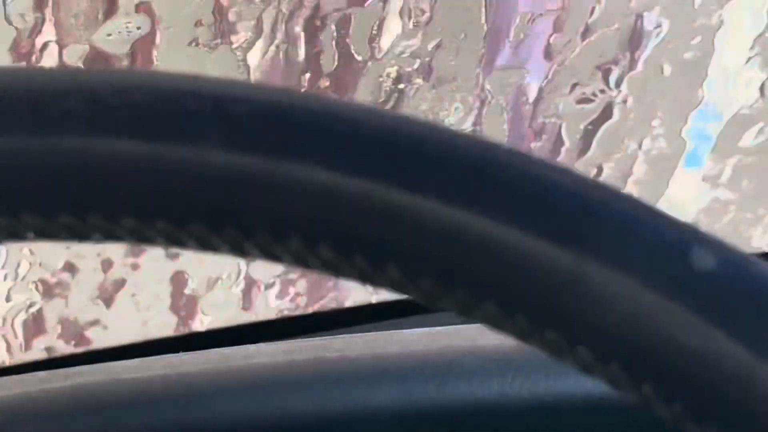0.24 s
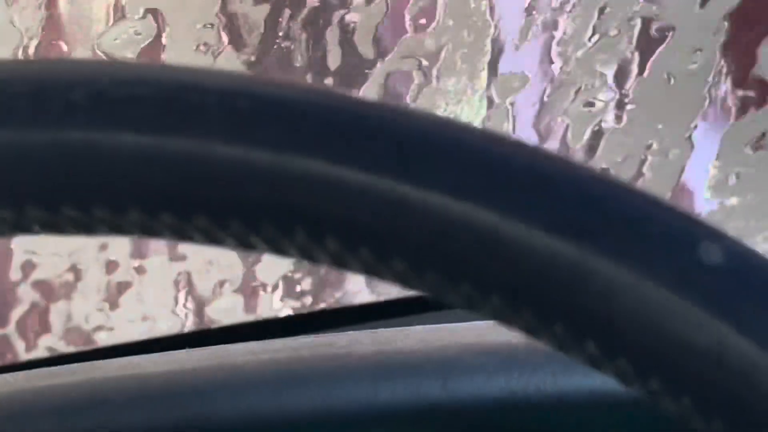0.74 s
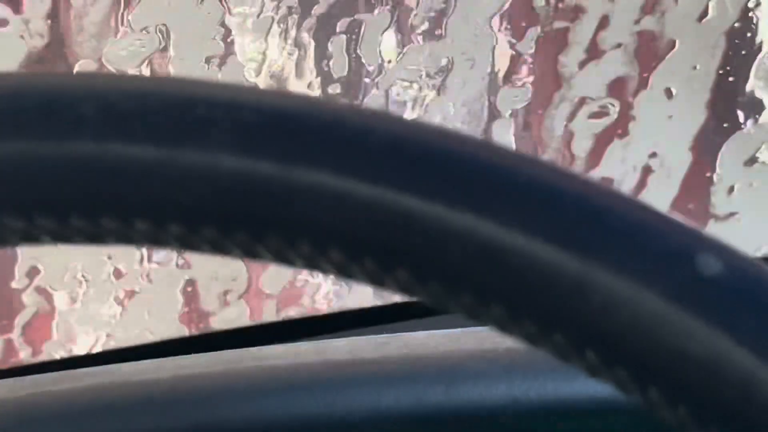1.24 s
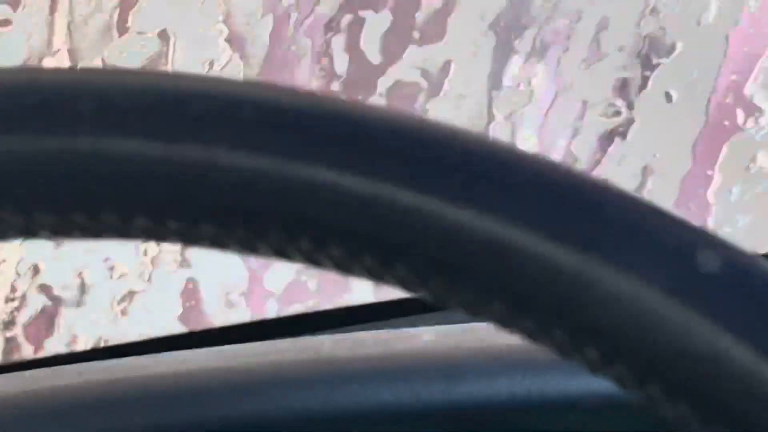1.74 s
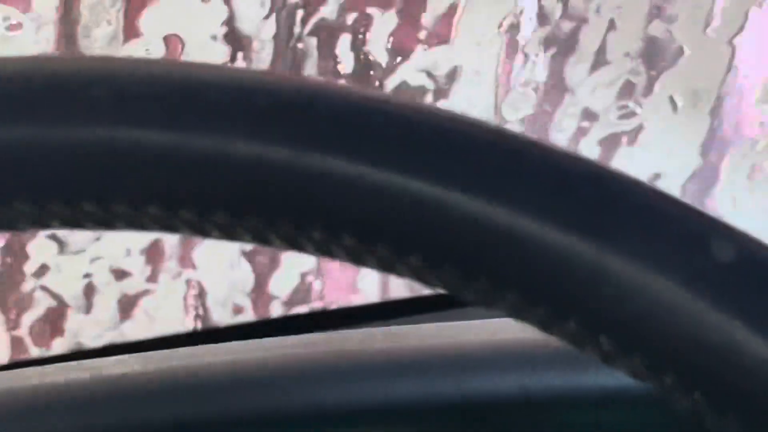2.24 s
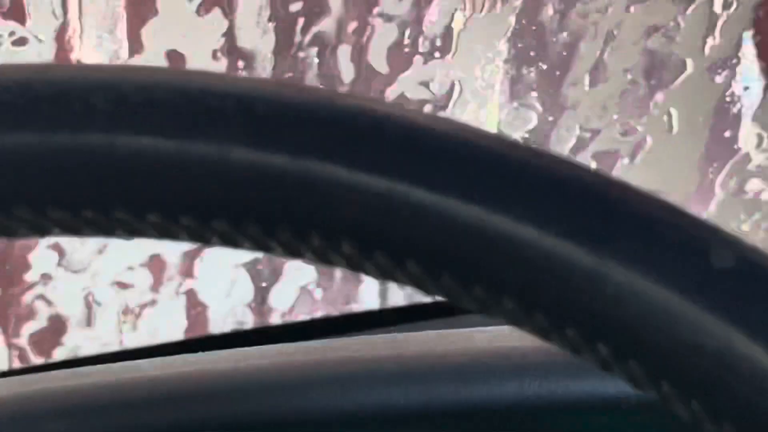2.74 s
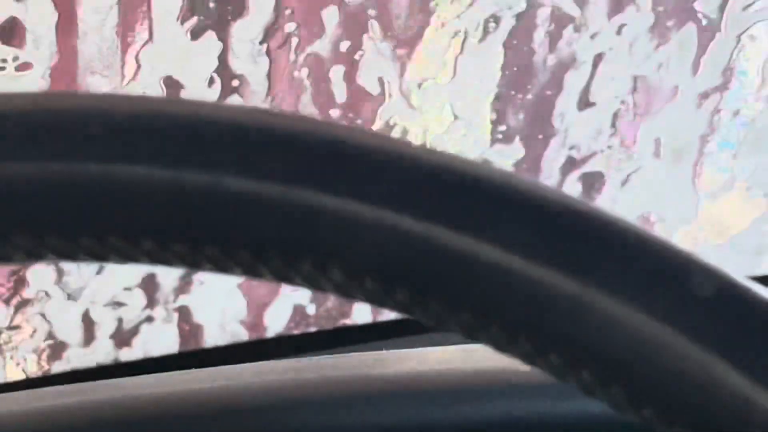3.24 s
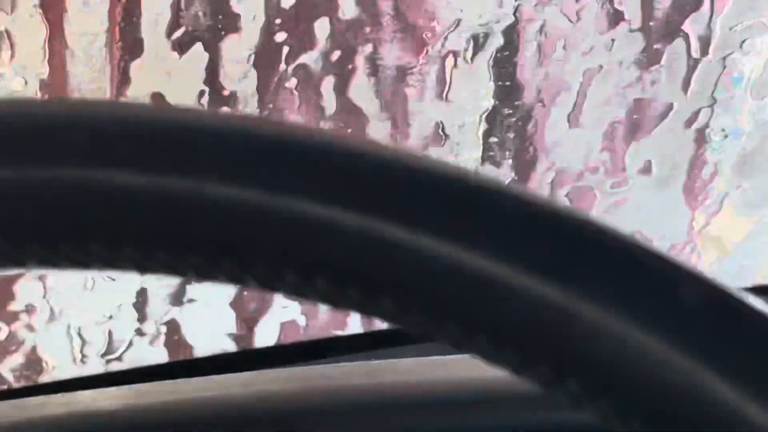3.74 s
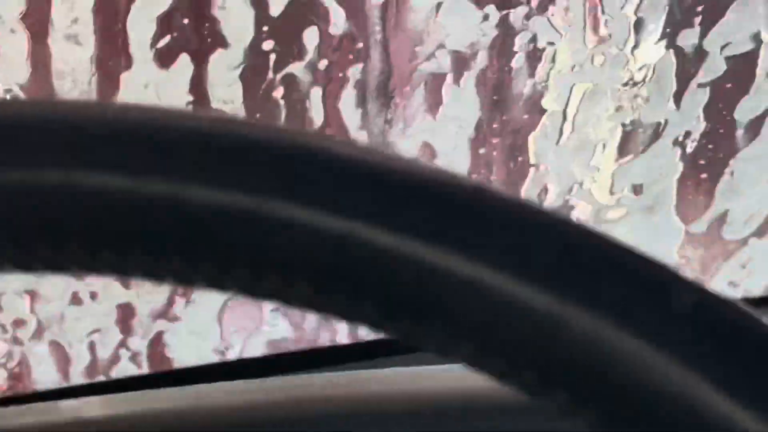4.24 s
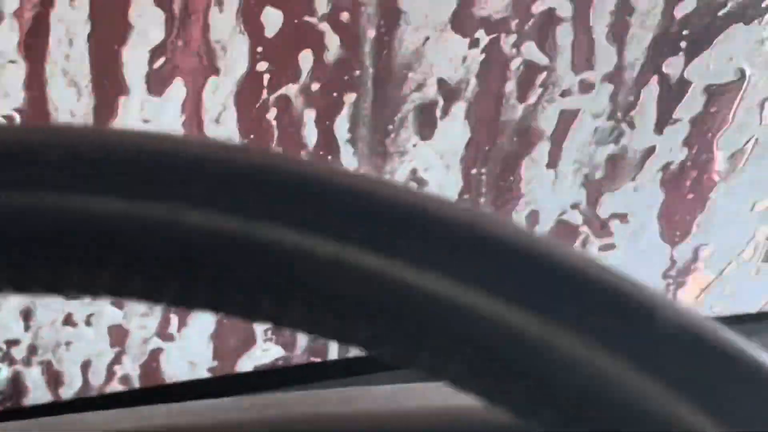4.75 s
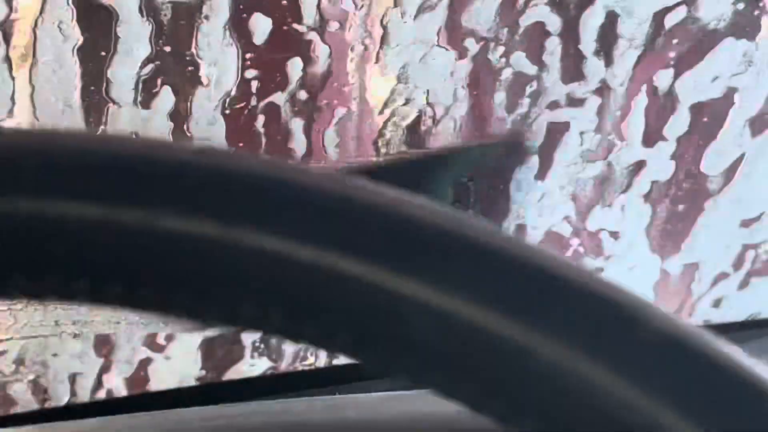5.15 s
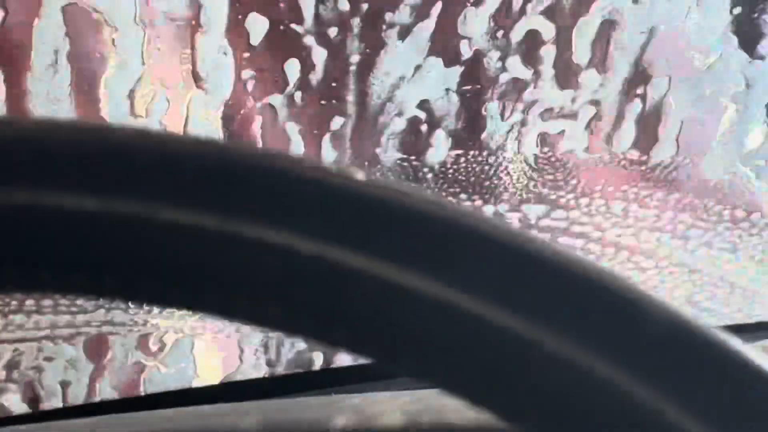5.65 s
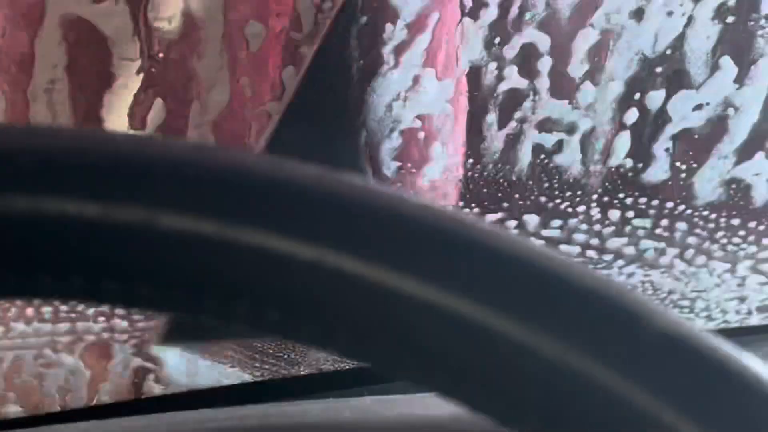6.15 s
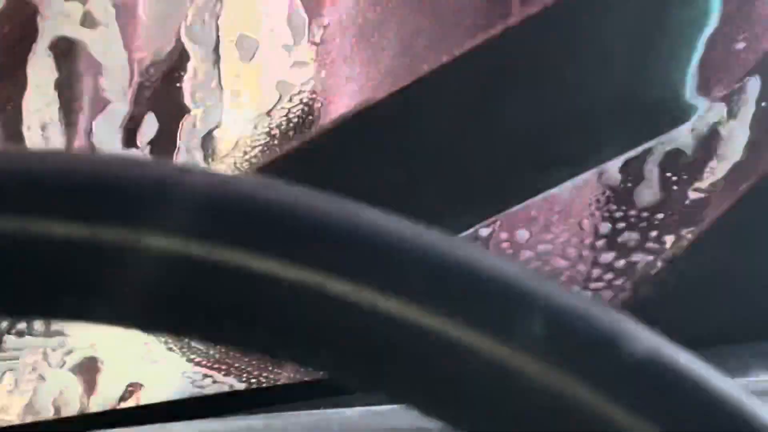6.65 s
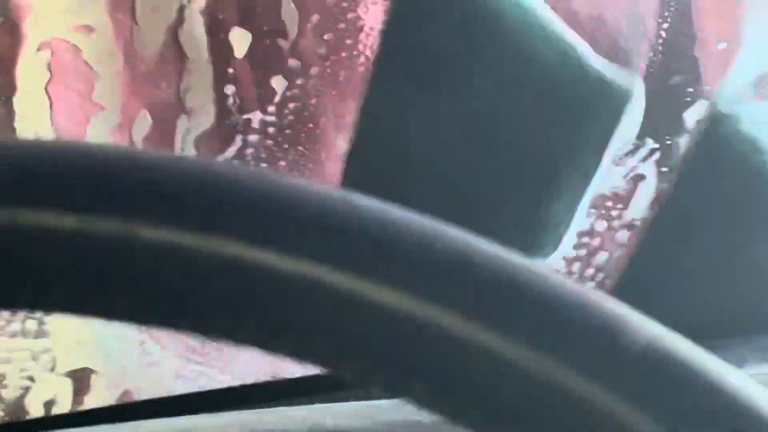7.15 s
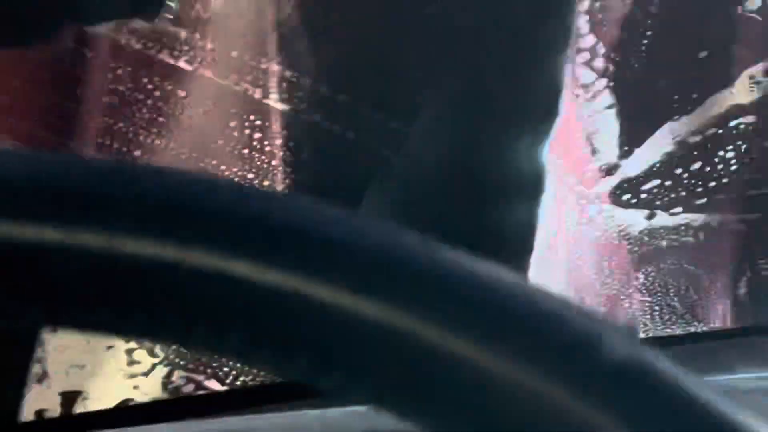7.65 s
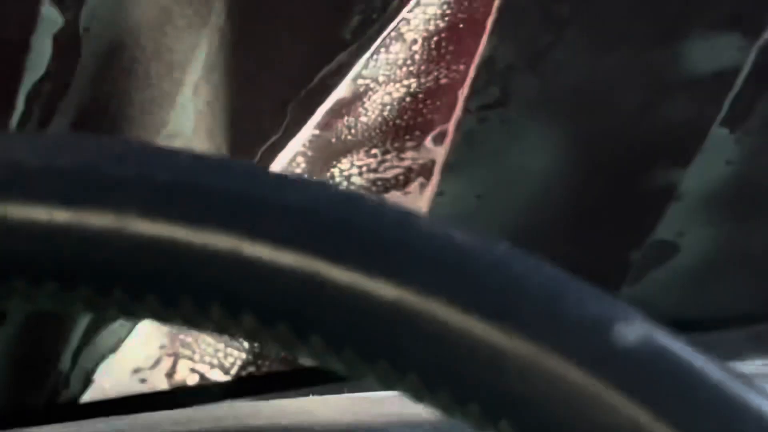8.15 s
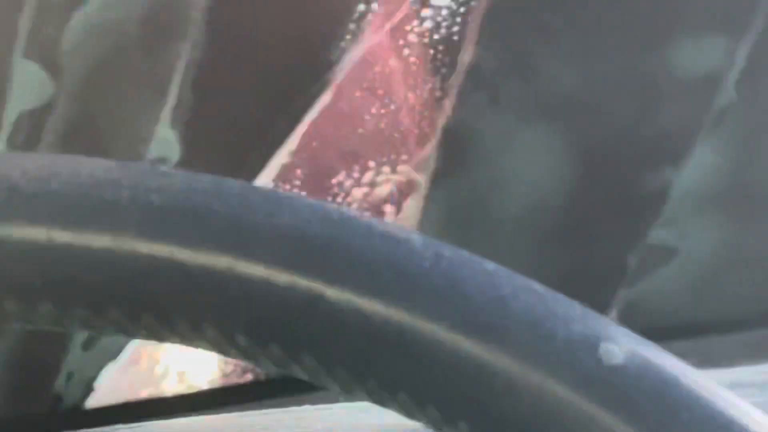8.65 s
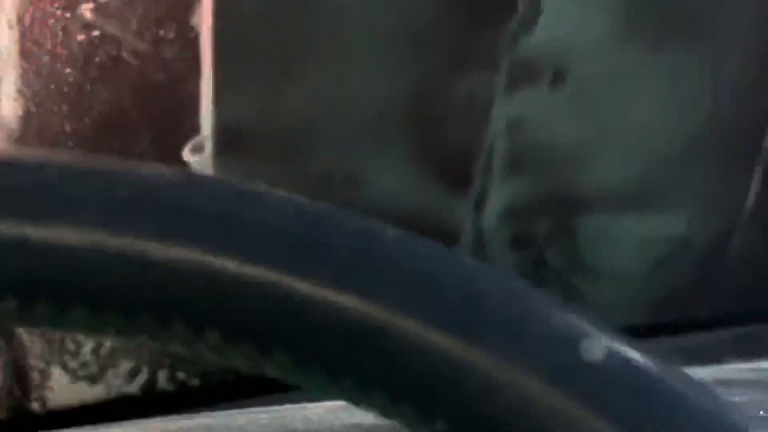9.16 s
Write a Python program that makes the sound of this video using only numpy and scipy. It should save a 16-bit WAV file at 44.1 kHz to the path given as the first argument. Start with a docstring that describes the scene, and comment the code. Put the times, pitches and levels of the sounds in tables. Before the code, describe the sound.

Inside a car in an automatic car wash: a deep steady rumble, droning motors and a wavering pump whine, with water washing and drops ticking.

```python
"""Inside a closed car in an automatic car wash. Water and cloth strips shake the panels into a rumble,
water washes over the roof, and spray and mist hiss on the glass, all coloured by the cabin's resonances.
Motors drone through the body, and a pump hums and throbs while its vanes add a whine that comes and goes.
Heavy drops smack the windscreen among lighter ticks. One wet strip thuds on the roof, and near the end
another drags across the glass."""
import sys
import numpy as np
from scipy import signal
from scipy.fft import rfft, irfft, next_fast_len
from scipy.io import wavfile
from scipy.ndimage import uniform_filter1d, minimum_filter1d, map_coordinates

SR = 44100
rng = np.random.default_rng(int(sys.argv[2]) if len(sys.argv) > 2 else 0)


def wav_out(sig):
    """Save sig, one row per channel (or a flat mono array), as 16-bit PCM at SR to the path in sys.argv[1]."""
    wavfile.write(sys.argv[1], SR, np.round(np.clip(np.atleast_2d(sig).T, -1, 1) * 32767).astype(np.int16))


N = 414981
TIME = np.arange(N) / SR


# Panel vibration spectrum. Each row: frequency in Hz, relative spectral density in dB.
RUMBLE_SPECTRUM = [(18, -34.5), (30, -20.5), (43, -7.5), (70, -2), (105, -2), (135, -5.5), (190, -9.5),
                   (270, -13), (355, -15.5), (395, -20.5), (600, -28.5), (1200, -68.5), (4000, -110)]

def panel_rumble(level_db=-16.5, surge_db=0.5):
    """Forced vibration: water and cloth drive the panels at random, and these radiate mostly bass."""
    return amp(level_db + surge_db * wobble(3)) * cabin(churn(patchy_db=0.1), RUMBLE_SPECTRUM)


# Spectrum of running water. Each row: frequency in Hz, relative spectral density in dB.
WASH_SPECTRUM = [(200, -28.5), (400, -3.5), (520, 0), (720, -8), (900, -9), (1050, -11.5), (1450, -13),
                 (1950, -20), (2250, -22), (2800, -26), (4000, -43.5), (8000, -60.5)]

def roof_wash(start_db=-30.5, rise_db_per_s=0.1644, surge_db=0.34):
    """Flow noise: water runs over the roof, growing as the car rolls in under the cloth strips."""
    level_db = start_db + rise_db_per_s * TIME + surge_db * wobble(4)
    return amp(level_db) * cabin(churn(patchy_db=0.7), WASH_SPECTRUM)


# The big motor swelling with its load. Each row: time in seconds, relative level in dB.
DRONE_LEVELS = [(0.0, -19.5), (0.65, -17), (2.6, -19.5), (3.9, -22), (4.25, -22), (4.5, -18), (6.75, -19.5),
                (7.45, -14.5), (7.7, -23.5), (7.9, -15), (8.35, -21.5), (9.4, -15)]
# Other machines in the tunnel. Each row: frequency in Hz, level in dB.
MACHINE_TONES = [(44.3, -26), (53.1, -30.5), (115, -36), (151, -40), (156.6, -31), (313.3, -41), (354, -43)]

def motors(drone_hz=70.8, gain_db=1, octave_db=-25, drift_hz=0.12, waver_db=2):
    """Structure-borne sound: brush and conveyor motors drone through the body, wavering with load."""
    level_db, = curves(DRONE_LEVELS)
    shaft = phase_of(drone_hz + drift_hz * wobble(1.91))
    big = amp(level_db + gain_db) * (tone(shaft) + amp(octave_db) * tone(2 * shaft))
    others = sum(amp(db + waver_db * wobble(2.5)) * tone(phase_of(hz + drift_hz * wobble(1.508)))
                 for hz, db in MACHINE_TONES)
    return (big + others) * lean_left(db=0.5)


# The pump's hum. Each row: multiple of the shaft frequency, level in dB.
HUM_ORDERS = [(3, -33), (4, -37), (5, -44), (6, -43.5), (7, -49), (11, -53.5)]
# Its throb. Each row: time in seconds, relative levels in dB of the first and second shaft orders.
THROB_LEVELS = [(0.0, -34, -38), (1.0, -24.5, -34), (2.9, -23.5, -29.5), (4.4, -33.5, -30.5),
                (6.05, -29.5, -23), (6.75, -31.5, -38), (9.4, -31, -30.5)]

def pump(shaft_hz=59.2, drift_hz=0.09, waver_db=2, throb_gain_db=1):
    """Rotational harmonics: the water pump sounds at whole multiples of its shaft frequency."""
    shaft = phase_of(shaft_hz + drift_hz * wobble(4))
    hum = sum(amp(db + waver_db * wobble(4)) * tone(order * shaft) for order, db in HUM_ORDERS)
    throb = sum(amp(db + throb_gain_db + waver_db * wobble(4.5)) * tone(order * shaft)
                for order, db in enumerate(curves(THROB_LEVELS), 1))
    return (hum + throb + vane_whine(shaft)) * lean_left(db=1.6)


# The whine coming and going. Each row: time in seconds, relative level in dB.
WHINE_LEVELS = [(0.0, -46), (0.15, -45), (0.25, -30), (0.38, -31.5), (0.48, -40), (0.68, -38), (0.85, -30),
                (0.97, -44), (1.2, -36), (1.31, -24.5), (1.39, -32), (1.48, -35), (1.67, -39), (1.8, -32),
                (1.92, -27.5), (2.02, -39.5), (2.15, -26), (2.32, -47), (2.65, -32.5), (2.85, -41),
                (3.1, -30), (3.3, -27), (3.62, -26), (3.86, -35.5), (4.07, -27), (4.25, -36), (4.4, -31.5),
                (4.6, -35.5), (4.75, -31), (4.85, -47), (5.2, -44), (5.35, -26.5), (5.55, -34.5),
                (5.73, -28.5), (5.88, -40), (6.15, -39.5), (6.3, -30), (6.55, -27.5), (6.88, -42.5),
                (7.12, -32.5), (7.25, -41), (7.4, -31), (7.68, -38), (7.92, -29), (8.05, -35), (8.25, -30),
                (8.35, -45), (8.48, -30.5), (8.85, -39), (8.98, -33.5), (9.35, -38)]
# Its sag under load. Each row: time in seconds, frequency shift in Hz.
WHINE_SAG = [(0.0, 0), (1.7, 1.5), (2.6, -1), (3.4, 0), (5.0, -1), (5.2, -6), (5.5, -1), (6.0, 0), (8.0, 1),
             (9.0, -1.5)]

def vane_whine(shaft, vanes=8, gain_db=0.43, octave_db=-24, flutter_db=3, stir_rad=0.45, lag_rad=0.58):
    """Blade-passing tone: each of the pump's vanes gives one pressure pulse per turn of the shaft."""
    level_db, = curves(WHINE_LEVELS)
    shift_hz, = curves(WHINE_SAG)
    passing = vanes * shaft + phase_of(shift_hz)
    # The whine reaches each ear by its own path, stirred by the moving water and cloth.
    ears = np.array([amp(flutter_db * wobble(28)) * tone(passing + lag + stir_rad * wobble(14))
                     for lag in (0, lag_rad)])
    octave = amp(octave_db + flutter_db * wobble(16)) * tone(2 * passing + stir_rad * wobble(30))
    return amp(level_db + gain_db) * (ears + octave)


# Heavy drops on the windscreen. Each row: start in seconds, relative smack level in dB, pitch in Hz,
# relative splash level in dB, time in seconds for the first crack to decay by 60 dB.
HEAVY_DROPS = [(3.058, -37.5, 3900, -68, 0.0045), (3.898, -54, 5000, -53.5, .008),
               (3.947, -52.5, 5470, -55, .025), (4.384, -51, 5000, -55.5, .014),
               (4.812, -48.5, 5500, -53.5, .035), (4.83, -51, 5030, -54.5, .03),
               (4.909, -48, 5000, -55, .03), (5.056, -47, 4200, -67, .02), (5.7, -44.5, 4600, -62, .016),
               (5.733, -39.5, 5400, -53, .034), (6.058, -45, 4600, -61, .032),
               (6.085, -41, 4200, -50, .018), (6.53, -44, 3000, -68.5, .02),
               (6.609, -42.5, 2600, -69, .018), (6.705, -38, 3200, -63.5, 0.016),
               (7.066, -37, 2200, -57.5, .03), (7.199, -40, 3000, -68.5, .014),
               (7.212, -35, 2600, -68, .016), (8.402, -44, 3400, -69, .008), (8.501, -40, 3200, -68, .008)]
# Spectra of smack and splash. Each row: frequency in Hz, relative spectral density in dB.
SMACK_SPECTRUM = [(1200, -9.5), (3000, 4.5), (4500, -2.5), (6500, -2.5), (9000, -23), (15000, -23)]
SPLASH_SPECTRUM = [(4000, -10.5), (8000, -3), (12000, 7.5), (15000, -4.5)]

def drops(smack_gain_db=2, splash_gain_db=-1, tail_db=-9, tail_stretch=5.8, width_octaves=0.76):
    """Impact noise: a drop cracks on the glass and splashes; a tight bead ticks, a loose blob spatters."""
    out = np.zeros((2, N + SR))
    t = np.arange(SR // 5) / SR
    hz = np.fft.rfftfreq(len(t), 1 / SR)
    smacks = cabin(rng.standard_normal((2, N)), SMACK_SPECTRUM)
    splashes = cabin(rng.standard_normal((2, N)), SPLASH_SPECTRUM)
    for start, smack_db, pitch_hz, splash_db, t60 in HEAVY_DROPS + light_drops():
        span = slice(round(start * SR), round(start * SR) + len(t))
        attack = 1 - np.exp(-t / (0.03 * t60))
        decay = amp(-60 * t / t60) + amp(tail_db - 60 * t / (tail_stretch * t60))
        band = np.exp(-0.5 * (np.log2((hz + 1) / pitch_hz) / width_octaves) ** 2)
        smack = amp(smack_db + smack_gain_db) * unit(irfft(rfft(smacks[:, span]) * band, len(t)))
        splash = amp(splash_db + splash_gain_db) * splashes[:, span]
        out[:, span] += attack * decay * (smack + splash)
    return out[:, :N]


def light_drops(count=45, smack_db=-46, spread_db=2, centre_hz=3600, splash_db=-65, t60=0.0057):
    """Random arrivals: small drops of uneven size and pitch, as rows like those of HEAVY_DROPS."""
    return [(when * (N / SR - 0.25), smack_db + spread_db * (2 * size - 1),
             centre_hz * 2 ** (pitch - 0.5), splash_db, t60)
            for when, size, pitch in rng.random((count, 3))]


# A strip landing on the roof. The entries: peak time in seconds, frequency in Hz, peak level in dB.
ROOF_THUD = (1.94, 35, -20)

def cloth_thud(half_length_s=0.053):
    """Panel-to-air coupling: a heavy wet strip pushes the roof and the cabin air booms briefly."""
    middle, hz, db = ROOF_THUD
    return amp(db) * bell(middle, half_length_s) * tone(2 * np.pi * hz * (TIME - middle))


# A strip crossing the glass. The entries: middle in seconds, half length in seconds, level in dB.
GLASS_DRAG = (9.28, 0.18, -33)
# Its swish. Each row: frequency in Hz, relative spectral density in dB.
SWISH_SPECTRUM = [(150, -18), (240, 8.5), (400, -8), (620, 2), (850, -10), (1250, -2), (1900, -14.5),
                  (4000, -28), (9000, -49.5)]

def cloth_drag():
    """Friction noise: a wet strip slides over the glass with an uneven swish."""
    middle, half_length, db = GLASS_DRAG
    envelope = amp(db + 2 * wobble(25)) * bell(middle, half_length)
    return envelope * cabin(churn(patchy_db=5), SWISH_SPECTRUM)


# Spectrum of spray on glass. Each row: frequency in Hz, relative spectral density in dB.
SPRAY_SPECTRUM = [(1200, -18), (2800, 5), (4000, -0.7), (5500, -6), (7000, -9.5), (9000, -40.5),
                  (14000, -33.5)]

def spray(level_db=-48, impact_share=0.43):
    """Shot noise: dense droplet impacts pepper the glass and merge with a hiss."""
    hiss = np.sqrt(1 - impact_share) * churn(patchy_db=0.8)
    impacts = np.sqrt(impact_share) * patter(per_second=1700, spread_db=0.5)
    return amp(level_db + 0.3 * wobble(11)) * cabin(hiss + impacts, SPRAY_SPECTRUM)


# Spectrum of the mist. Each row: frequency in Hz, relative spectral density in dB.
MIST_SPECTRUM = [(4000, -20), (7000, -0.5), (8300, 2), (9700, 2.5), (11000, 1.2), (12500, -1.8),
                 (14500, -9)]
# Wipes of the windscreen. Each row: middle in seconds, half length in seconds, lift in dB.
MIST_WIPES = [(2.032, 0.06, 3), (7.1, 0.11, 3), (7.543, 0.09, 2)]

def mist(level_db=-64):
    """Amplitude-modulated noise: the mist's fine hiss swells as wet strips wipe the windscreen."""
    wiping_db = sum(lift_db * bell(middle, half_length) for middle, half_length, lift_db in MIST_WIPES)
    return amp(level_db + wiping_db + 0.5 * wobble(18)) * cabin(churn(patchy_db=1.3), MIST_SPECTRUM)


# The cabin's resonances and dips. Each row: centre in Hz, width in Hz, gain in dB.
CABIN_RESONANCES = [(100, 16, 0.5), (347.4, 6.1, 4), (686, 30, 1.5), (877, 50, 2.5), (948, 15, 5.5),
                    (1630, 26, -4), (1697, 58, 2.5), (1928, 170, 4), (2570, 50, -0.5), (2570, 52, 1),
                    (3680, 160, -1.5), (3840, 130, 2), (7040, 77, 2.5)]
# Likeness of the two ears, then its top treble. Each row: frequency in Hz, correlation from -1 to 1.
COHERENCE = [(70, 1), (130, 0.97), (240, 0.72), (350, 0.88), (470, 0.7), (640, 0.3), (760, 0.48),
             (950, 0.27), (1150, 0.24), (1320, -0.25), (1600, -0.46), (1720, 0.59), (2600, 0.87), (4200, 1),
             (6300, 0.7)]
TREBLE_COHERENCE = [(7200, 0), (8300, -.65), (9700, 0), (11500, .7), (14500, 0)]
# Balance between the ears. Each row: frequency in Hz, left minus right level in dB.
EAR_BALANCE = [(40, 1.5), (85, 0), (175, 4), (260, -1), (370, 3), (750, 0), (1100, -1.5), (1600, -7.5),
               (1642, -2), (1690, -7), (1900, -7.5), (2100, -4.5), (2700, -.5), (5000, 0)]

def cabin(pair, spectrum):
    """Enclosure response: two unrelated signals are coloured and partly shared by the ears; rms 1."""
    size = next_fast_len(N, real=True)
    hz = np.fft.rfftfreq(size, 1 / SR)
    correlation = np.clip(along(COHERENCE + TREBLE_COHERENCE, hz), -0.999, 0.999)
    angle = np.arccos(correlation) / 2
    resonance_db = sum(db / (1 + (2 * (hz - centre) / width) ** 2)
                       for centre, width, db in CABIN_RESONANCES)
    coloured = rfft(pair, size) * amp(along(spectrum, hz) + resonance_db)
    mid, side = coloured * [np.cos(angle), np.sin(angle)]
    ears = np.array([mid + side, mid - side]) * lean_left(along(EAR_BALANCE, hz))
    return unit(irfft(ears, size)[:, :N])


def churn(patchy_db):
    """Random modulation: two noises whose bands swell and sink in short patches."""
    bands = signal.stft(rng.standard_normal((2, N)), nperseg=512)[2]
    patches = uniform_filter1d(rng.standard_normal(bands.shape[1:]), size=7, axis=0)
    patches = uniform_filter1d(patches, size=16, axis=1)
    noise = signal.istft(bands * amp(patchy_db * unit(patches)), nperseg=512)[1]
    return unit(noise[:, :N])


def patter(per_second, spread_db):
    """Poisson process: two streams of droplet impacts of uneven size."""
    lands = rng.random((2, N)) < per_second / SR
    sizes = amp(spread_db * np.clip(rng.standard_normal((2, N)), -2, 2))
    return unit(lands * sizes * np.sign(rng.standard_normal((2, N))))


def amp(db):
    """Decibels to amplitude ratio."""
    return np.exp(np.asarray(db) * (np.log(10) / 20))


def unit(x):
    """Normalisation to rms 1."""
    return x / np.sqrt(np.mean(x ** 2) + 1e-20)


def lean_left(db):
    """Interaural level difference: left and right gains, db apart."""
    return amp(db * np.array([[0.5], [-0.5]]))


def along(points, hz):
    """Interpolation of (Hz, value) points on a logarithmic frequency axis."""
    knot_hz, values = np.transpose(points)
    return np.interp(np.log(hz + 1), np.log(knot_hz + 1), values)


def curves(rows):
    """Linear interpolation: one value per sample for each column after the time."""
    seconds, *columns = np.transpose(rows)
    return [np.interp(TIME, seconds, column) for column in columns]


def bell(middle_s, half_length_s):
    """Gaussian envelope, down to 1/e a half length from its middle."""
    return np.exp(-((TIME - middle_s) / half_length_s) ** 2)


def wobble(rate):
    """Smooth random fluctuation: a spline through rate knots a second."""
    knots = rng.standard_normal(1024)
    coarse = np.arange(0, N, 64)
    return np.interp(np.arange(N), coarse, map_coordinates(knots, [coarse * rate / SR], mode="mirror"))


def phase_of(hz):
    """Phase as the integral of frequency, from a random start."""
    return 2 * np.pi * (np.cumsum(hz) / SR + rng.random())


def tone(phase):
    """A sinusoid of rms 1."""
    return np.sqrt(2) * np.sin(phase)


def scene():
    """Superposition: machines, water and cloth add at the driver's seat."""
    machines = motors() + pump()
    water = panel_rumble() + roof_wash() + spray() + mist() + drops()
    return machines + water + cloth_thud() + cloth_drag()


def record(dry, ceiling=0.82, top_hz=14450):
    """Peak and band limiting: the tallest peaks are eased down, the ends softened, the top cut off."""
    needed = ceiling / np.maximum(np.abs(dry).max(axis=0), ceiling)
    gain = uniform_filter1d(minimum_filter1d(needed, size=900), size=900)
    fade = signal.windows.tukey(N, 0.0006)
    size = next_fast_len(N + SR // 4)
    passband = np.fft.rfftfreq(size, 1 / SR) < top_hz
    return irfft(rfft(dry * gain * fade, size) * passband, size)[:, :N]


dry = scene()
out = record(dry)
wav_out(out)
```